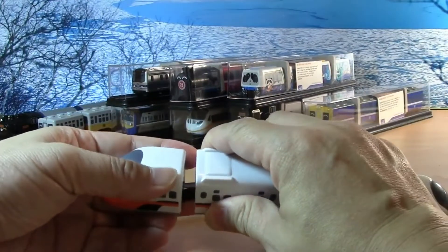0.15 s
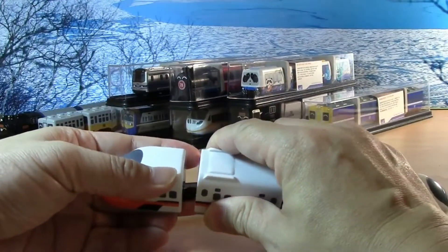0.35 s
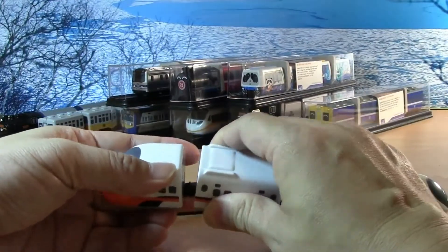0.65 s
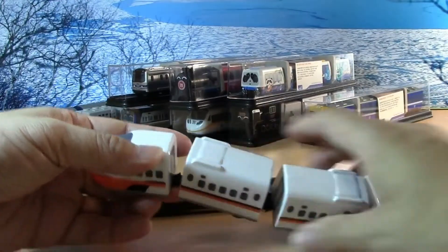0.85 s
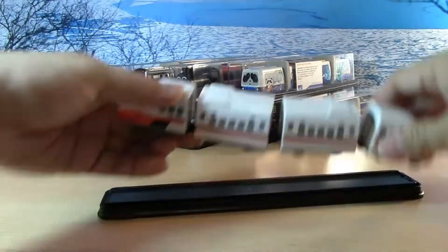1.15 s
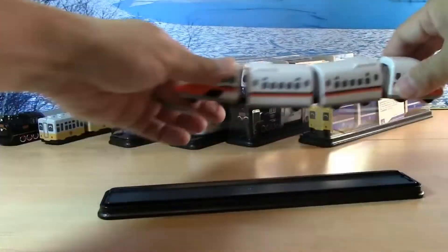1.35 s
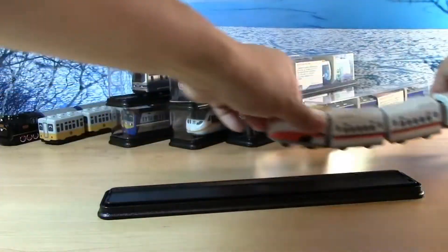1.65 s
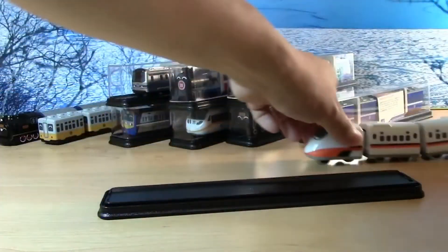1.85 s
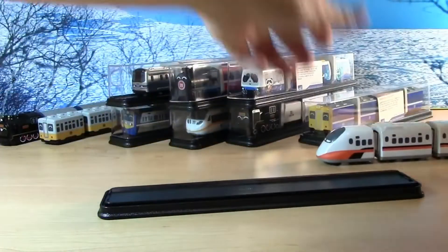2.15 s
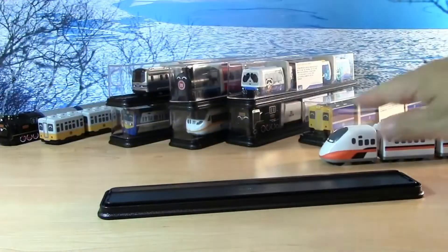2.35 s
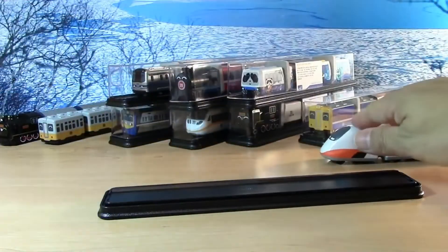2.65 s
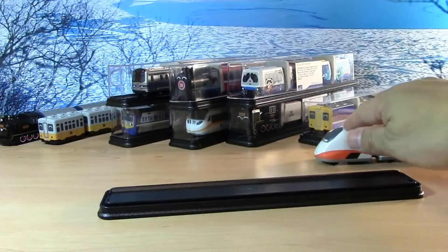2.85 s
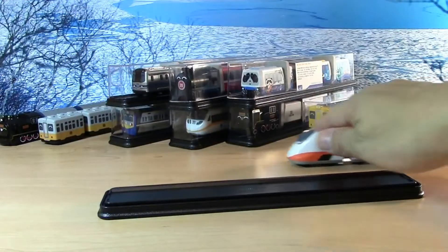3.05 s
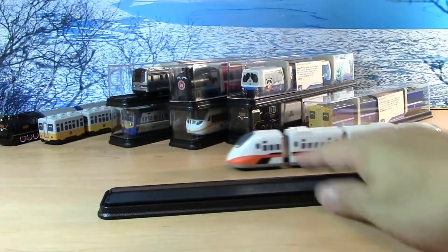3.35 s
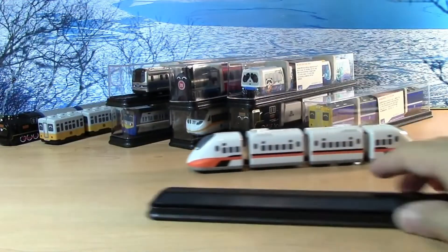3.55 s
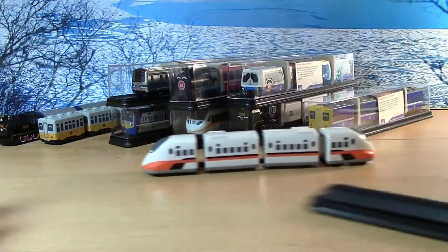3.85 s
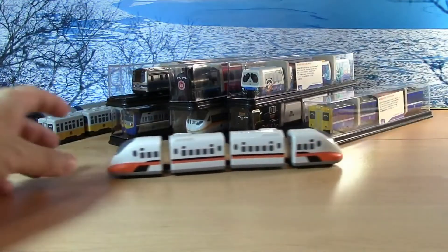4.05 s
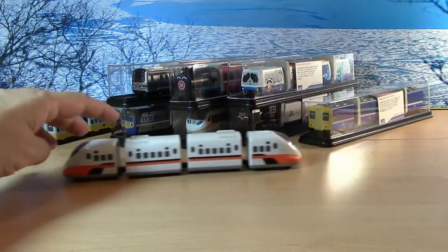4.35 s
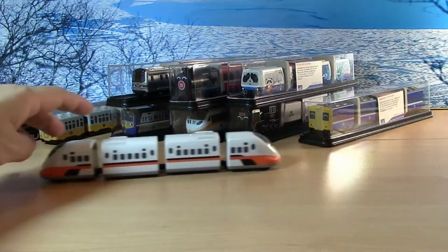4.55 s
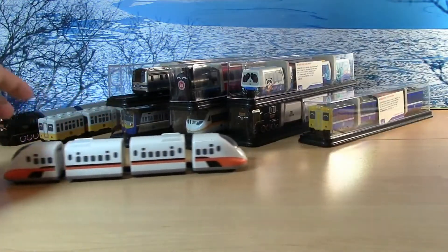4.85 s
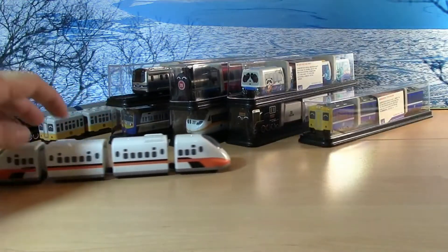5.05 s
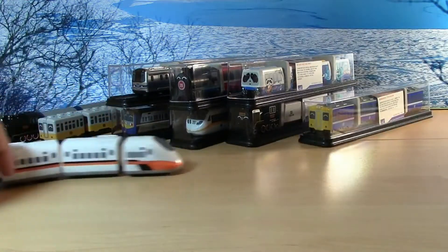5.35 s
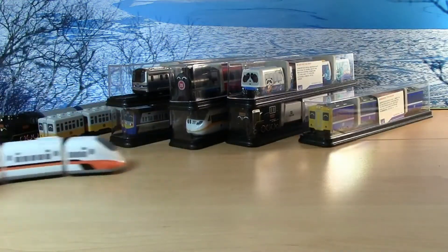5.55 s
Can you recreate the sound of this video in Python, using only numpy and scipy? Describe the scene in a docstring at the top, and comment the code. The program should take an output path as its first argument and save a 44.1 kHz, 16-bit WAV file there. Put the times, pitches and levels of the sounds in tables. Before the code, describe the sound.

Grainy toy gears whir and wind down, followed by hollow knocks, wheels rumbling and scraping over wood, a quick rail rattle, and a faint hand brush.

```python
"""A toy train's spring motor whirs in the hand, close to two microphones over a wooden desk in a small room.
Gear teeth are streams of tiny collisions rung through a hollow plastic shell; knocks are short noise bursts.
On the desk wheels rumble, axles tick and a stroke drags back as a hiss with a moving echo.
A display rail chatters in its own ringing modes as it is taken away, then a hand brushes the desk.
Low thuds of the desk, a short room tail and quiet indoor noise lie around it all."""
import sys
import numpy as np
from scipy import signal
from scipy.fft import rfft, next_fast_len
from scipy.io import wavfile
from scipy.ndimage import uniform_filter1d, map_coordinates

SR = 44100
rng = np.random.default_rng(int(sys.argv[2]) if len(sys.argv) > 2 else 0)


def to_wav(s):
    """Save 16-bit WAV."""
    ch = np.atleast_2d(s).T  # columns
    pcm = np.round(np.clip(ch, -1, 1) * 32767)  # PCM
    wavfile.write(sys.argv[1], SR, pcm.astype(np.int16))


N = 250929
TIME = np.arange(N) / SR
TAPS = 4096  # length of a body's response, in samples
BINS = np.fft.rfftfreq(TAPS, 1 / SR)

# Runs of the spring motor in the hand. Each row: time up to speed in seconds, time braked in seconds,
# relative level in dB, sag by the end of the run in dB.
MOTOR_RUNS = [(0, 0.15, -27.5, 12), (0.452, 1.88, -20, 6.5), (1.918, 2.36, -22.5, 6.5)]
# Broad colour of the meshing gears. Each row: frequency in Hz, relative level in dB per Hz.
GEARBOX = [(45, -50), (100, -20), (150, -22), (200, -12.5), (320, -6), (500, -6), (760, 0), (1000, -2),
           (1310, 0.5), (3040, -0.5), (5250, -9), (7700, -15.5), (11000, -28), (16000, -47)]
# Peaks and dips of the car shell. Each row: frequency in Hz, width in Hz, lift in dB.
SHELL = [(296, 21, 4.5), (438, 16, 4), (765, 32, 4), (1325, 210, 6.5), (1910, 960, -8), (2690, 740, 4),
         (4270, 700, -7), (4530, 300, 10), (5290, 430, 6.5), (7200, 2100, 3.5), (9360, 490, 5),
         (10300, 150, -13)]
SPIN_UP_DB_PER_S, BRAKE_DB_PER_S = 233, 450
RUN_IN_DB, RUN_IN_S = 3, 0.26  # the gears gain their last bit of speed slowly


def motor(loose_db=-5.5, dulling=0.33):
    """Gear teeth clatter in the hollow car, weaker as the spring unwinds; loose ones snap brightly at times."""
    drive = np.zeros(N)
    for start, end, db, sag_db in MOTOR_RUNS:
        run_in_db = RUN_IN_DB * np.exp(-np.maximum(TIME - start, 0) / RUN_IN_S)
        run_db = db - run_in_db - sag_db * progress(start, end) ** 1.88
        drive = np.maximum(drive, held(start, end, run_db, SPIN_UP_DB_PER_S, BRAKE_DB_PER_S))
    mesh = colour(impacts(per_s=600, spread_db=3.0, contact_ms=0.67, grind=1.0), GEARBOX, SHELL)
    snaps = colour(impacts(per_s=160, spread_db=4.0, contact_ms=0.98, grind=.1), KNOCK_SNAP, SHELL)
    whir = unit(mesh, 1200, 7000) + amp(loose_db) * unit(snaps, 1200, 7000)
    # slow gears strike softly and sound dull
    slack_db = np.clip(-23 - 20 * np.log10(drive + 1e-9), 0, 9)
    return amp(-1.5) * shifting(whir, -dulling * slack_db, patchy_db=1.37) * drive


# Knocks of cars, couplings and fingers. Each row: time in seconds, relative peak of the hollow body in dB,
# relative peak of the bright snap in dB.
KNOCKS = [(0.446, -16, -29), (0.693, -20, -14), (0.816, -18, -14), (0.956, -30, -13.5), (1.991, -15.5, -38),
          (1.998, -13, -29), (2.04, -13.5, -26.5), (2.817, -7, -9), (3.016, -9, -17), (3.102, -21.5, -22.5),
          (3.135, -14, -28), (3.201, -15, -39), (3.221, -3.5, -13.5), (3.241, -15, -20),
          (3.511, -20.5, -16), (3.578, -13, -16), (3.592, -15, -27), (3.825, -23.5, -34.5),
          (3.932, -18.5, -22.5), (4.033, -13, -21.5), (4.051, -8.5, -43), (4.133, -17.5, -30),
          (4.146, -10.5, -23), (4.26, -25, -37), (4.525, -19, -17.5), (4.531, -9, -16),
          (4.749, -22.5, -40.5), (4.807, -21, -42), (4.831, -28.5, -47), (5.58, -36.5, -44.5)]
# Colour of the hollow body. Each row: frequency in Hz, relative level in dB per Hz.
KNOCK_BODY = [(90, -34), (400, -14.5), (750, 1.5), (1300, 11), (1800, -1.5), (2600, -2.5), (5000, -49)]
# Colour of the bright snap. Each row: frequency in Hz, relative level in dB per Hz.
KNOCK_SNAP = [(1200, -29), (2200, -4.5), (3100, 4), (4200, -2), (5400, -2), (8000, -6.5), (11000, -18.5),
              (16000, -39)]
# Peaks and dips of the train standing on the desk. Each row: frequency in Hz, width in Hz, lift in dB.
DESK = [(533, 160, -6.5), (797, 120, 3), (1076, 41, -1.5), (1300, 220, -2.5), (1600, 180, 3.5),
        (2090, 610, -3.5), (3460, 2100, 6.5), (3897.3, 640, -7.5), (5360, 390, 7.5), (7460, 290, 5.5)]
SNAP_DECAY_MS, KNOCK_RISE_MS = 2.9, 0.43
HARD_HZ, HARD_WIDTH_HZ, HARD_FROM_DB = 11900, 8100, -20  # the hardest snaps gain treble, dB for dB


def knocks(body_db=-5, snap_db=1, ring_db=-21, ring_ms=12, vary_db=3, crack=3.6):
    """A knock is a plastic clack: a crack of contact, a hollow body, a bright snap, a short after-rattle."""
    out, t = np.zeros(N), np.arange(TAPS) / SR
    ms = t * 10 ** 3
    rise = 1 - np.exp(-ms / KNOCK_RISE_MS)
    ring = amp(ring_db) * np.exp(-ms / ring_ms)
    for s, low_db, high_db in KNOCKS:
        body, snap = rng.standard_normal((2, TAPS))
        # the hollow body outlasts the snap
        body = body * (np.exp(-ms / (2.45 * SNAP_DECAY_MS)) + ring)
        snap = snap * (np.exp(-ms / SNAP_DECAY_MS) + ring)
        # each point of contact favours other resonances
        spot = [(hz, width, lift + vary_db * (2 * rng.random() - 1)) for hz, width, lift in DESK]
        spot.append((HARD_HZ, HARD_WIDTH_HZ, max(high_db - HARD_FROM_DB, 0)))
        parts = (body, KNOCK_BODY, low_db + body_db), (snap, KNOCK_SNAP, high_db + snap_db)
        for blow, spectrum, db in parts:
            part = colour(blow * rise + crack * (t == 0), spectrum, spot)
            peak = np.sqrt(uniform_filter1d(part ** 2, size=130).max())  # loudest 3 ms, rms
            add(out, s, amp(db) * part / peak)
    return out


# Spells of rolling over the desk: pushes that roll the train, and at 3.51 s the rail scraping as the train
# coasts. # Each row: start in seconds, end in seconds, relative level in dB.
PUSHES = [(1.957, 2.455, -24.5), (2.733, 2.976, -22), (2.966, 3.131, -18.5), (3.514, 3.65, -26.5),
          (3.936, 4.082, -26.5), (4.136, 4.236, -27.5), (4.275, 4.513, -20.5), (4.52, 4.684, -32.5)]
# Colour of the wheels on wood. Each row: frequency in Hz, relative level in dB per Hz.
WHEELS = [(88, -34), (150, -35), (334, -20.5), (414, -23), (466, -30), (514, -12.5), (774, -5), (998, -3),
          (1290, 1.5), (2600, -19), (3490, -15.5), (4670, -23), (5570, -25), (7620, -28), (16000, -53)]
JOLT_DB, JOLT_RISE_S, JOLT_DECAY_S = -11, 0.0081, 0.014  # every knock shakes the wheels


def wheels():
    """Small hard wheels bump over the wood and shake train and desk, when pushed and after every knock."""
    bumps = impacts(per_s=300, spread_db=-1.5, contact_ms=2.1, grind=1.0)
    rumble = unit(colour(bumps, WHEELS, DESK), 600, 1800)
    t, jolts = np.arange(SR // 4) / SR, np.zeros(N)
    shake = (1 - np.exp(-t / JOLT_RISE_S)) * np.exp(-t / JOLT_DECAY_S)
    for s, body_db, _ in KNOCKS:
        add(jolts, s, amp(body_db + JOLT_DB) * shake)
    rolling = np.max([push(*row) for row in PUSHES], axis=0)
    drive = np.sqrt(rolling ** 2 + jolts ** 2)
    return amp(-4.5) * shifting(rumble, 0, patchy_db=3.0) * drive


# Colour of the freely spinning gears. Each row: frequency in Hz, relative level in dB per Hz.
COAST_COLOUR = [(35, -20), (55, 3), (90, -20), (400, -28), (800, 2), (1500, 5), (1950, -3), (2330, 9),
                (2900, -7), (7000, -14.5), (10000, -16), (16000, -50)]
COAST_START_S, COAST_END_S, COAST_DB = 3, 3.9, -44


def coast():
    """Let go, the train runs on with its gears spinning lightly: a thin whirr."""
    teeth = impacts(per_s=210, spread_db=-5, contact_ms=0.59, grind=1.0)
    whirr = unit(colour(teeth, COAST_COLOUR), 600, 6000)
    return whirr * push(COAST_START_S, COAST_END_S, COAST_DB)


# Spells of rattling while the train is pressed or nudged on the desk. Each row: start in seconds,
# end in seconds, relative level in dB, ticks per second, share of steady grind.
RATTLES = [(2.82, 2.98, -39.5, 520, .45), (2.992, 3.146, -26, 700, .3), (3.199, 3.253, -28.5, 740, .4),
           (3.93, 4.208, -42.5, 50, .03)]
# Colour of the loose axles. Each row: frequency in Hz, relative level in dB per Hz.
RATTLE = [(800, -14), (1300, -20), (2100, -5), (2900, 6.5), (3700, 8.5), (4400, -2), (5400, 1.5),
          (7000, -7), (9600, -13.5), (12000, -28), (16000, -39)]


def rattle():
    """Axles and gears tick in their bearings: a dense grit when pressed, separate ticks when free."""
    out = np.zeros(N)
    for start, end, db, per_s, grind in RATTLES:
        ticks = impacts(per_s, spread_db=5.5, contact_ms=0.91, grind=grind)
        out += unit(colour(ticks, RATTLE), 2400, 7000) * push(start, end, db)
    return amp(1.5) * shifting(out, 0, patchy_db=3.0)


# Brief resonances of car or desk: a thin whine as the motor starts, then ones sounded by skidding or rubbing. #
# Each row: middle of the scrape in seconds, length in seconds, pitch in Hz, level in dB.
SCRAPES = [(0.379, 0.13, 2640, -42), (1.931, 0.09, 2760, -24.5), (1.993, .05, 1920, -22.5),
           (2.067, .13, 696, -29.5), (2.11, 0.064, 2820, -25), (2.253, .06, 2610, -28),
           (2.356, .1, 1770, -21), (2.654, 0.22, 3180, -25.5), (2.682, .2, 2410, -29.5),
           (2.85, 0.1, 770, -26.5), (2.862, 0.094, 2830, -25), (4.02, .2, 810, -32),
           (4.54, 0.045, 2900, -23)]


def scrapes(sharpness=4.7):
    """Skidding, rubbing or the starting motor briefly drives a resonance of car or desk: noise through a
    doubled narrow peak."""
    out = np.zeros(N)
    for s, length, hz, db in SCRAPES:
        peak = signal.iirpeak(hz, sharpness, SR)
        skid = signal.lfilter(*peak, rng.standard_normal(SR // 3))
        skid = signal.lfilter(*peak, skid)[:int(length * SR)]
        add(out, s - length / 2, amp(db) * np.hanning(len(skid)) * skid / skid.std())
    return out


# Speed of the train as it is dragged back over the desk. Each row: time in seconds, speed from 0 to 1.
DRAG_SPEED = [(2.2, 0), (2.235, .45), (2.43, 0.54), (2.53, 0.82), (2.7, 0.96), (2.79, 0.39), (2.86, 0.41),
              (2.93, 0.04)]
# Speed of the hand that brushes the desk. Each row: time in seconds, speed from 0 to 1.
BRUSH_SPEED = [(4.78, 0.06), (4.93, 0.52), (5.18, 0.94), (5.28, 0.71), (5.31, 0)]
# Friction colours, first the dragged train, then the hand. Each row within: frequency in Hz,
# relative level in dB per Hz.
SLIDE_COLOURS = [
    [(200, -34), (300, -5.5), (550, -12.5), (680, -1.5), (900, -4.5), (1150, 0.5), (1900, -1.5), (2400, 0),
     (3200, 0), (4100, -9), (5300, -8), (7500, -13.5), (10000, -17), (16000, -44)],
    [(500, -36), (1050, -14), (1300, -1), (2100, -1), (3200, 3), (4200, -4), (7200, -0.5), (9500, -5.5),
     (16000, -20)],
]
HISS_HZ, HISS_RISE_HZ = 3640, 3420  # pitch of the friction hiss at rest, and its rise at full speed
REFLECTION_MS, REFLECTION_DROP_MS = 2.394, 0.64  # delay of its reflection at rest, drop at full speed


def slide(motion, spectrum, db, tilt_db, dulling_db_per_s, swirl, echo=0.67, echo_hz=5000, sing=0.9):
    """Friction hiss grows and rises with speed, dulls along the stroke; a dull reflection sweeps a comb."""
    s, speeds = np.transpose(motion)
    speed = np.interp(TIME, s, speeds, left=0, right=0)
    hiss = colour(impacts(per_s=2800, spread_db=0, contact_ms=0.85, grind=0.55), spectrum)
    hiss = hiss + swirl * sing * resonate(hiss, HISS_HZ + HISS_RISE_HZ * speed, width_hz=530)
    delay = (REFLECTION_MS - REFLECTION_DROP_MS * speed) * SR / 10 ** 3
    dull = signal.filtfilt(*signal.butter(1, echo_hz, fs=SR), hiss)
    reflected = map_coordinates(dull, [np.arange(N) - delay], order=1)
    hiss = unit(hiss + swirl * echo * reflected, 2400, 12000)
    tilt = tilt_db - dulling_db_per_s * (np.clip(TIME, s[0], s[-1]) - s[0])
    return amp(db) * shifting(hiss, tilt, patchy_db=3.5 * swirl, pivot_hz=4070) * speed


CHATTER_S, CHATTER_GAP_S, CHATTER_DB = 3.598, 0.015, -9.5
CHATTER_HOLD_S, CHATTER_FADE_DB_PER_S = 0.031, 236
REBOUND_S, REBOUND_DB = .006, -9.5  # lag and level against the blow before it


def chatter(count):
    """Steady blows of the rocking rail as (s, dB): even, then fading, each with a weak rebound."""
    age = np.arange(count) * CHATTER_GAP_S
    fade_db = CHATTER_FADE_DB_PER_S * np.maximum(age - CHATTER_HOLD_S, 0)
    blows = list(zip(CHATTER_S + age, CHATTER_DB - fade_db))
    return blows + [(s + REBOUND_S, db + REBOUND_DB) for s, db in blows]


# Ringing modes of the display rail. Each row: frequency in Hz, relative level in dB,
# time to fall by 60 dB in seconds.
RAIL = [(1400, -17, 0.23), (2775, -1.5, 0.049), (2830, -3.5, 0.1), (2920, -33, 0.028), (4610, -15, 0.028),
        (4960, -19, 0.058), (6980, -13, 0.017), (10800, -18.5, 0.025)]
RAIL_LIFT_S, RAIL_LIFT_DB = 3.848, -25.5  # one last tap as it leaves the desk


def rail(scuff=0.14, scuff_ms=6):
    """The stiff rail rings in nearly the same modes at every bounce, roughened by a short scuff."""
    out, t = np.zeros(N), np.arange(SR // 4) / SR
    for s, db in chatter(count=9) + [(RAIL_LIFT_S, RAIL_LIFT_DB)]:
        detune = 1 + 0.013 * rng.standard_normal(len(RAIL))
        ring = np.zeros(len(t))
        for (hz, mode_db, t60), ratio in zip(RAIL, detune):
            ring += amp(mode_db - 60 * t / t60) * np.sin(2 * np.pi * hz * ratio * t)
        grit = rng.standard_normal(len(t)) * np.exp(-t * 10 ** 3 / scuff_ms)
        ring = signal.fftconvolve(ring, (t == 0) + scuff * grit)[:len(t)]
        add(out, s, amp(db) * (ring / abs(ring).max() + 0.18 * colour(grit, RATTLE)))
    # keep only the rail's ringing above 600 Hz
    return signal.sosfilt(signal.butter(2, 600, "highpass", fs=SR, output="sos"), out)


# Soft bumps of the hands on the desk. Each row: time in seconds, relative level in dB.
THUDS = [(0.591, -41.5), (0.943, -46), (1.099, -43), (2.028, -42), (3.23, -53), (4.159, -45), (5.301, -47)]
KNOCK_THUD_DB = -40.5  # share of each knock that reaches the desk's lowest mode


def thuds(desk_hz=98, t60=0.22, trim_db=-2):
    """Bumps of the hands and knocks of the train set off the desk's lowest mode, a decaying sine."""
    out, t = np.zeros(N), np.arange(SR // 2) / SR
    rise = 1 - np.exp(-t / 0.0039)
    mode = amp(trim_db - 60 * t / t60) * np.sin(2 * np.pi * desk_hz * t) * rise
    for s, db in THUDS + [(s, body_db + KNOCK_THUD_DB) for s, body_db, _ in KNOCKS]:
        add(out, s, amp(db) * mode)
    return out


# Decay of the small room. Each row: frequency in Hz, time to fall by 60 dB in seconds.
ROOM = [(200, 0.44), (800, 0.38), (2800, 0.19), (6000, 0.13), (14000, 0.17)]


def room(x, wet_db=-12, side_db=-8, side_ms=8):
    """A small room's tail, plus a faint stereo-difference part, weakest around 700 Hz."""
    count = SR // 2
    late, early = rng.choice([-1., 1.], (2, count)) * (rng.random((2, count)) < 3000 / SR)
    hz, t, z = signal.stft(late * (TIME[:count] > .004), SR, nperseg=256)
    tail = signal.istft(z * amp(-60 * t / read(ROOM, hz)[:, None]), SR)[1]
    early = early * np.exp(-TIME[:count] * 10 ** 3 / side_ms)
    mid, side = (signal.fftconvolve(x, taps / np.linalg.norm(taps))[:N] for taps in (tail, early))
    side_colour = [(150, -7), (700, -48), (1500, -26), (4000, -8), (12000, -13.5)]  # Hz, dB
    side = amp(side_db) * colour(side, side_colour)
    return x + amp(wet_db) * mid + np.array([side, -side])


# Colour of the quiet room. Each row: frequency in Hz, relative level in dB per Hz.
ROOM_TONE = [(25, -28), (60, -21.5), (100, -12), (150, -11.5), (200, -7.5), (335, -5.5), (520, -9),
             (1300, -14.5), (2000, -20.5), (3000, -21.5), (6000, -26.5), (10000, -36.5), (16000, -48)]
ROOM_TONE_DB = -49  # rms of the part common to both channels


def room_tone(apart=0.26):
    """Quiet indoor background: steady coloured noise, nearly alike in both channels."""
    mid, side = (colour(noise, ROOM_TONE) for noise in rng.standard_normal((2, N)))
    return amp(ROOM_TONE_DB) * np.array([mid + apart * side, mid - apart * side]) / mid.std()


def impacts(per_s, spread_db, contact_ms, grind):
    """Tiny uneven collisions, each a short scrape, over a steady grind."""
    chance, size, grit = rng.random(N), rng.exponential(1, N), rng.standard_normal(N)
    blows = (chance < per_s / SR) * amp(spread_db * np.minimum(size, np.pi))
    decay = np.exp(-1 / (contact_ms * SR / 10 ** 3))
    power = signal.lfilter([1], [1, -decay], blows ** 2)
    return grit * np.sqrt(power / power.mean() + grind ** 2)


def colour(x, spectrum, resonances=()):
    """Rings x through a causal (minimum-phase) body: a broad spectrum with peaks and dips on it."""
    db = read(spectrum, BINS)
    for hz, width, lift in resonances:
        db = db + lift / (1 + (2 * (BINS - hz) / width) ** 2)
    log_gain = np.log(amp(np.r_[db, db[-2:0:-1]]))
    response = np.fft.ifft(np.exp(np.conj(signal.hilbert(log_gain)))).real
    return signal.oaconvolve(x, response)[:len(x)]


def shifting(x, tilt_db, patchy_db, pivot_hz=2800):
    """As grip and contact move, patches of colour come and go; tilt_db per octave brightens or dulls."""
    hz, t, z = signal.stft(x, SR, nperseg=512, noverlap=384)
    patches = rng.standard_normal(z.T.shape)
    for _ in range(2):
        patches = uniform_filter1d(patches, size=30, axis=0)  # over time
        patches = uniform_filter1d(patches, size=4, axis=1)  # over frequency
    octaves = np.log2(np.clip(hz, 300, 8000) / pivot_hz)[:, None]
    tilt = octaves * np.interp(t, TIME, tilt_db * np.ones(N))
    db = patchy_db * patches.T / patches.std() + tilt
    return signal.istft(z * amp(db), SR, nperseg=512, noverlap=384)[1][:N]


def resonate(x, hz, width_hz):
    """A resonance of gain 1 that follows the curve hz."""
    turn, r = np.exp(2j * np.pi * np.cumsum(hz) / SR), np.exp(-np.pi * width_hz / SR)
    return 2 * (turn * signal.lfilter([1 - r], [1, -r], x / turn)).real


PUSH_EASE_DB, PUSH_RISE_DB_PER_S, PUSH_FALL_DB_PER_S = 4.5, 600, 330


def push(start, end, db):
    """Gain of one push or spell of motion: strongest in the middle, easing toward both ends."""
    ease_db = PUSH_EASE_DB * (2 * progress(start, end) - 1) ** 2
    return held(start, end, db - ease_db, PUSH_RISE_DB_PER_S, PUSH_FALL_DB_PER_S)


def held(start, end, db, rise_db_per_s, fall_db_per_s):
    """Gain that rises until start, follows db, and dies away after end."""
    before, after = np.maximum(start - TIME, 0), np.maximum(TIME - end, 0)
    return amp(db - rise_db_per_s * before - fall_db_per_s * after)


def progress(start, end):
    """Runs from 0 at start to 1 at end."""
    return np.clip((TIME - start) / (end - start), 0, 1)


def unit(x, lo_hz, hi_hz):
    """Scales x so that its part within a band has rms 1."""
    size = next_fast_len(len(x), True)
    hz = np.fft.rfftfreq(size, 1 / SR)
    band = rfft(x, size)[(hz > lo_hz) & (hz < hi_hz)]
    return x / np.sqrt(2 * np.sum(abs(band) ** 2) / (size * len(x)) + 1e-20)


def amp(db):
    """Decibels to gain."""
    return np.exp(np.asarray(db) * (np.log(10) / 20))


def read(points, hz):
    """A frequency table joined by straight lines over log frequency."""
    f, value = np.transpose(points)
    return np.interp(np.log(hz + 1), np.log(f), value)


def add(mix, s, sound):
    """Mixes a sound in at time s."""
    part = mix[max(round(s * SR), 0):][:len(sound)]
    part += sound[:len(part)]


def scene():
    """The toy, the desk and the room around them."""
    train = motor() + knocks() + wheels() + coast() + rattle() + scrapes()
    drag = slide(DRAG_SPEED, SLIDE_COLOURS[0], db=-21.0, tilt_db=7.0, dulling_db_per_s=10.5, swirl=0.95)
    brush = slide(BRUSH_SPEED, SLIDE_COLOURS[1], db=-40.0, tilt_db=2.0, dulling_db_per_s=8.5, swirl=0.2)
    return room(train + drag + brush + rail() + thuds()) + room_tone()


EDGE_HZ = 15950


def record(dry):
    """Peaks are clipped at full scale; then a steep low-pass takes off the top treble."""
    lowpass = signal.firwin(511, EDGE_HZ, window=("kaiser", 9), fs=SR)
    return signal.oaconvolve(np.clip(dry, -1, 1), lowpass[None], "same", axes=1)


dry = scene()
out = record(dry)
to_wav(out)
```